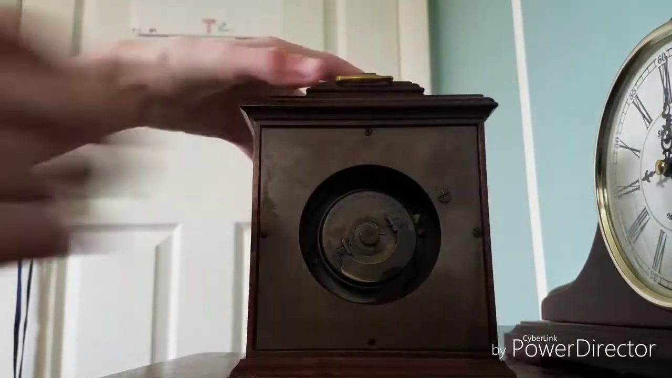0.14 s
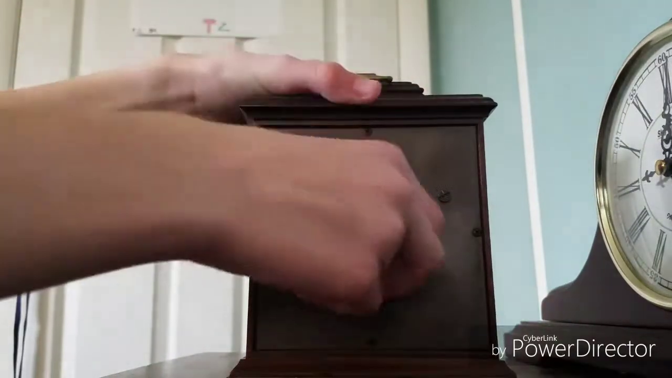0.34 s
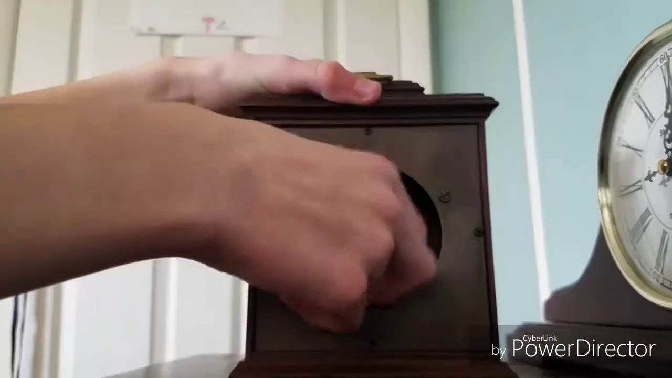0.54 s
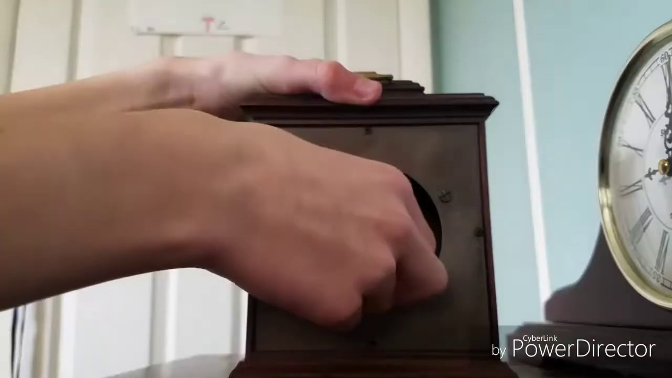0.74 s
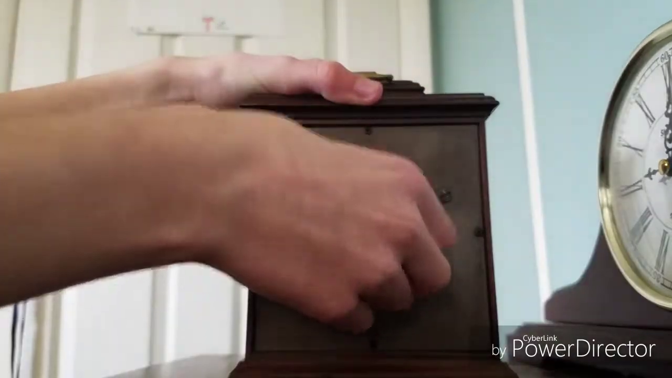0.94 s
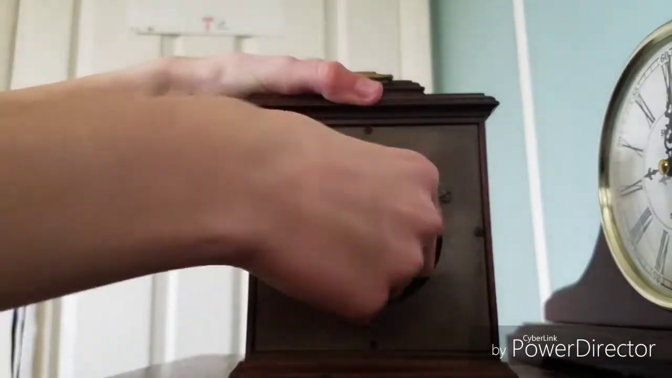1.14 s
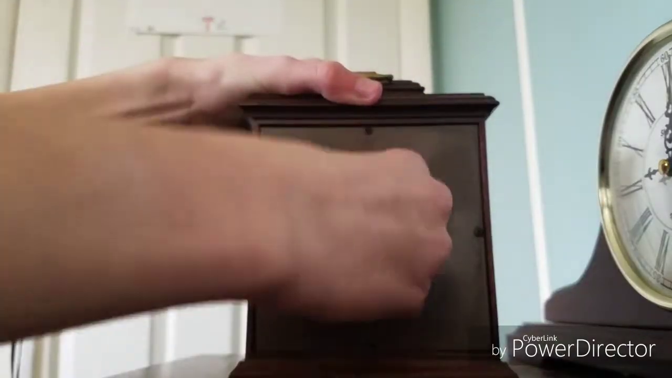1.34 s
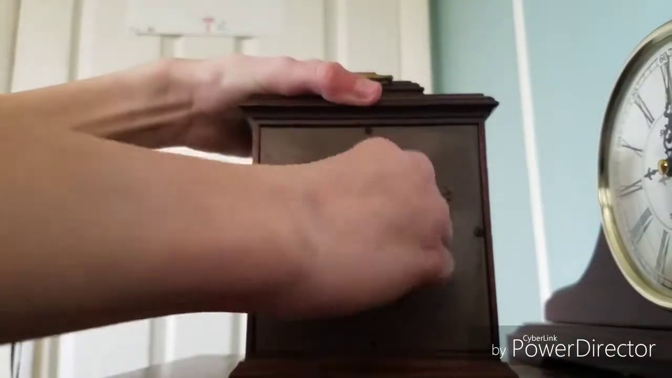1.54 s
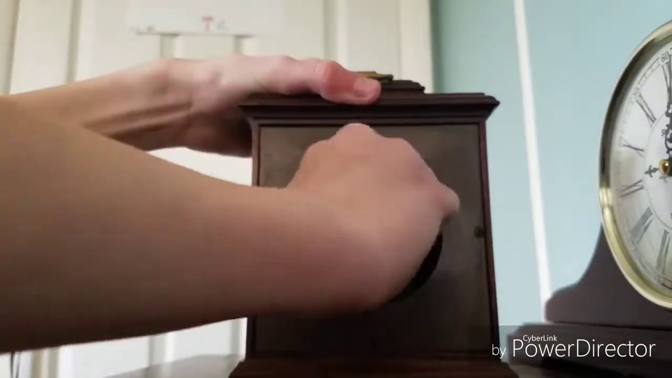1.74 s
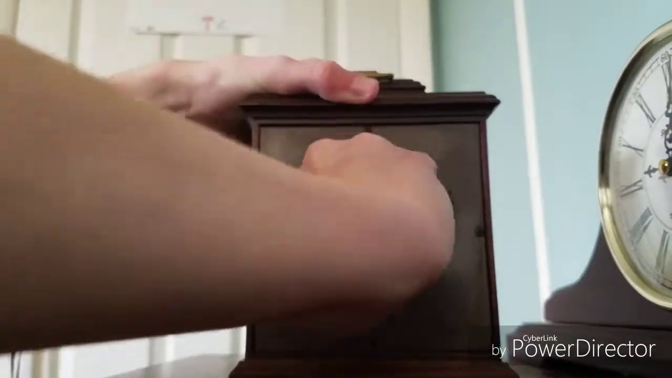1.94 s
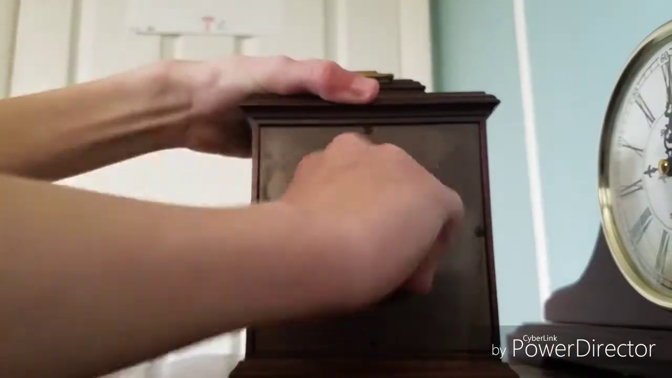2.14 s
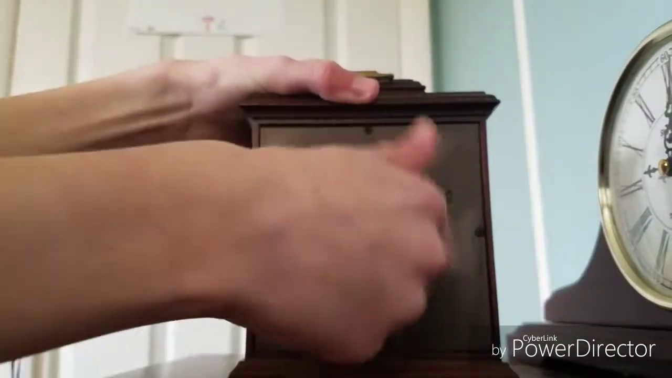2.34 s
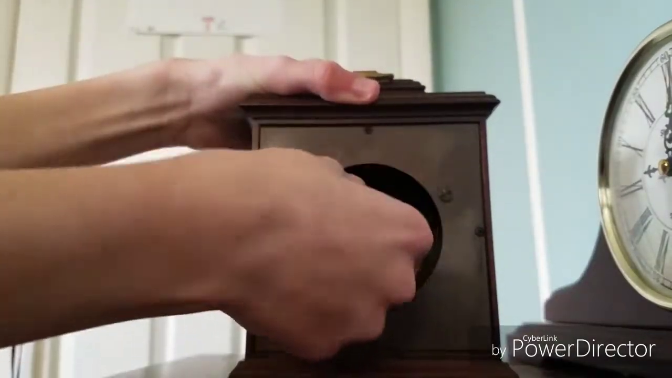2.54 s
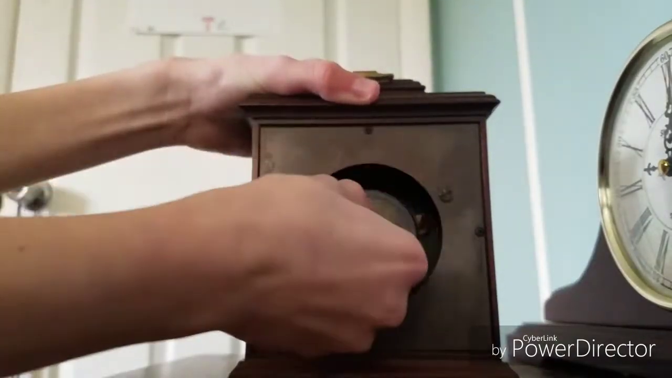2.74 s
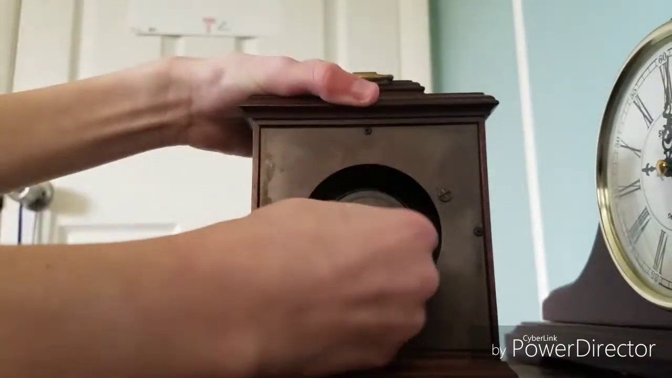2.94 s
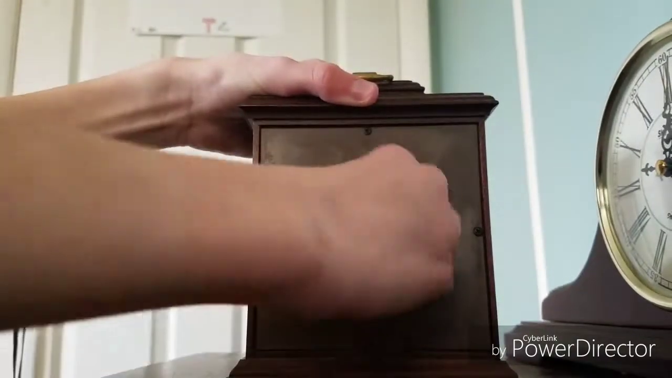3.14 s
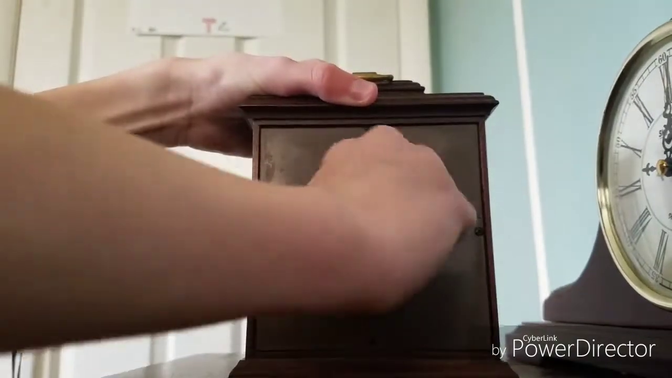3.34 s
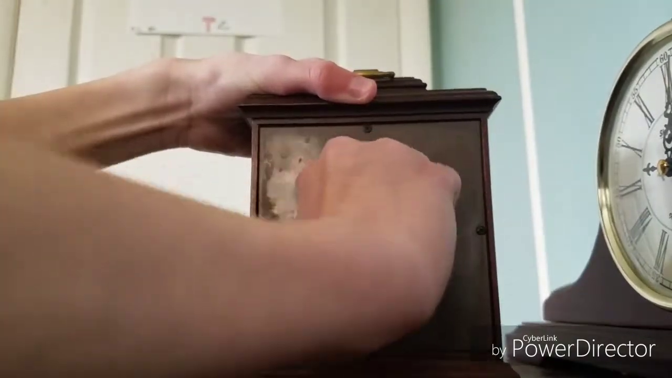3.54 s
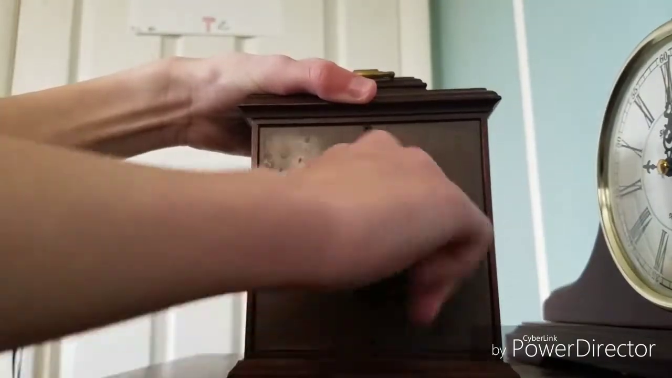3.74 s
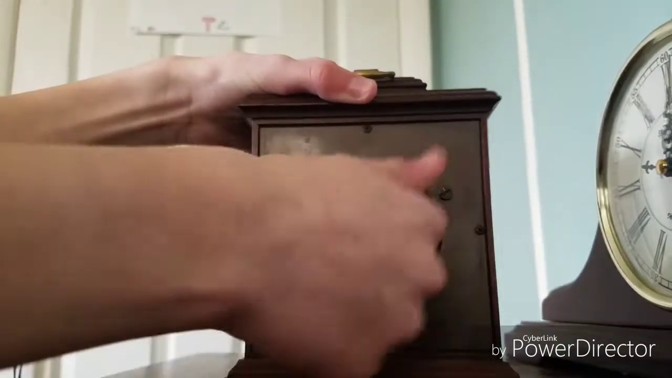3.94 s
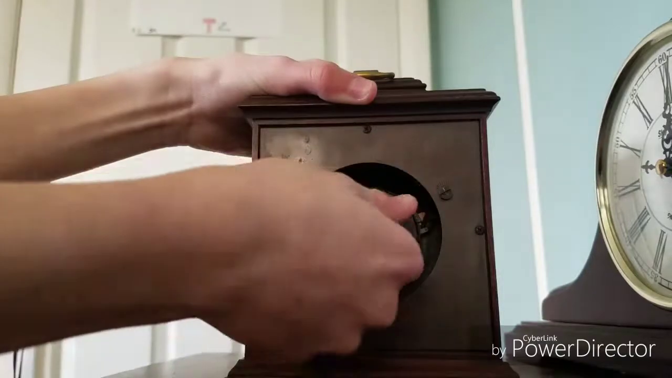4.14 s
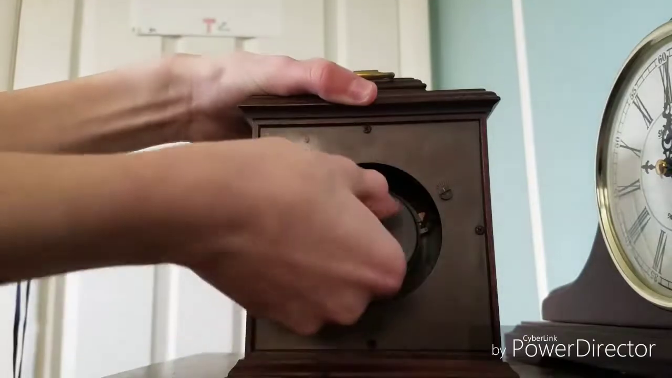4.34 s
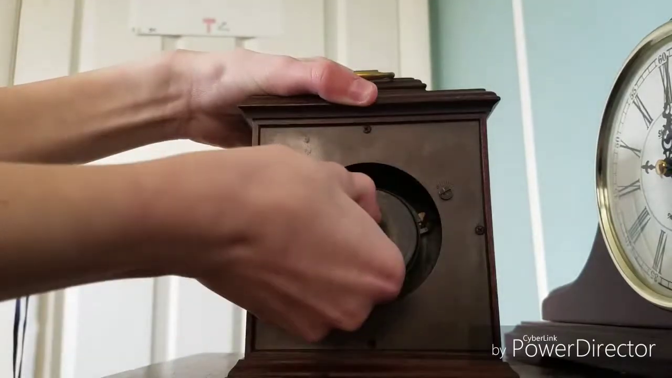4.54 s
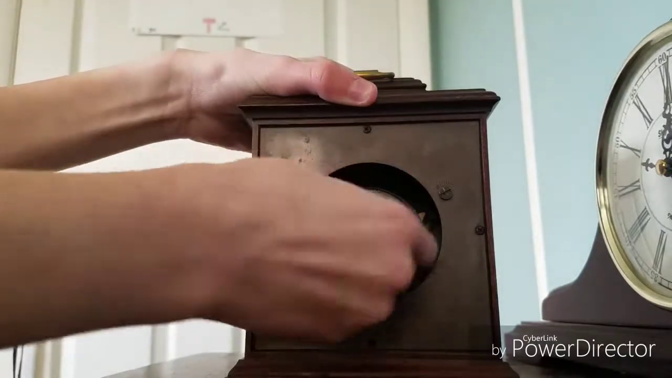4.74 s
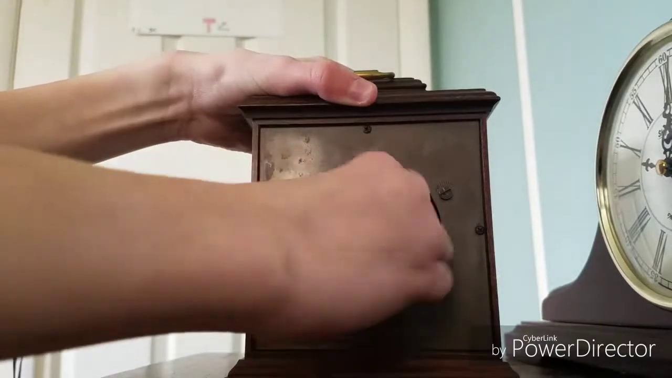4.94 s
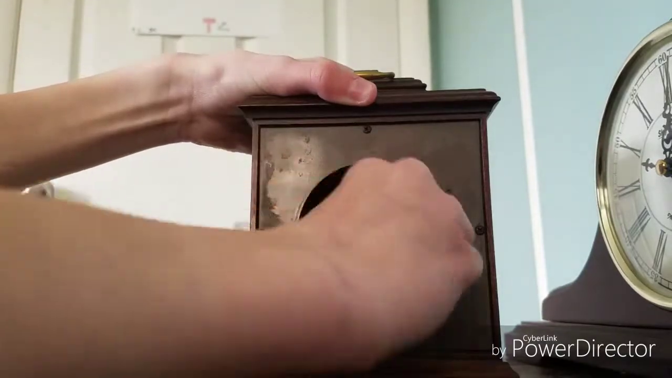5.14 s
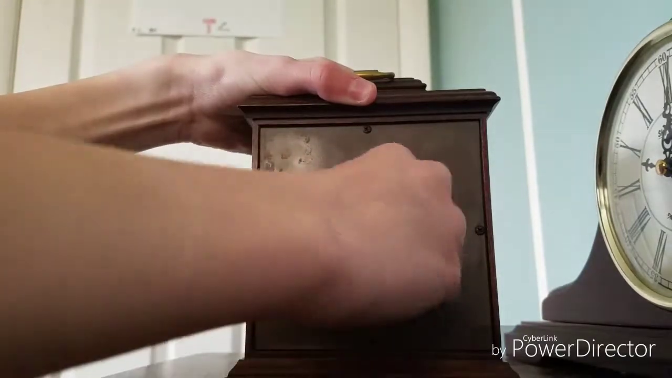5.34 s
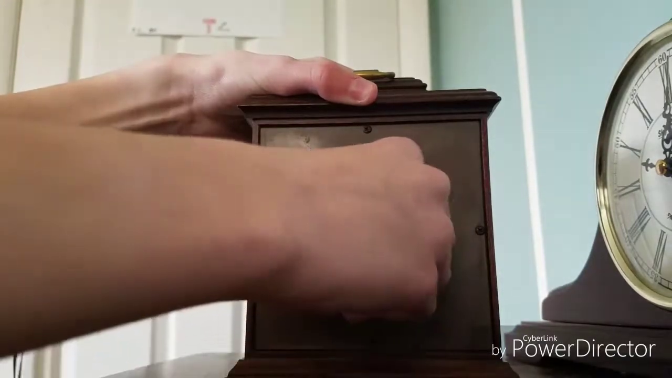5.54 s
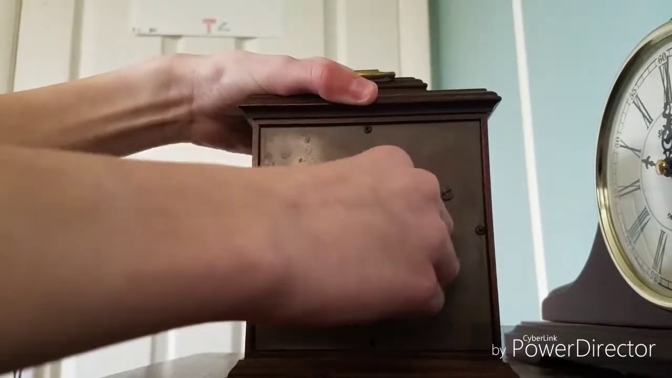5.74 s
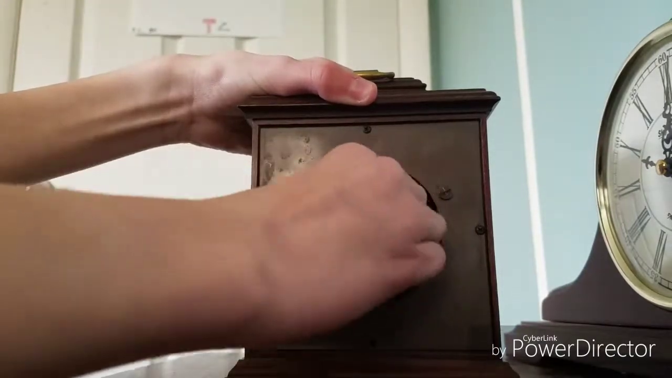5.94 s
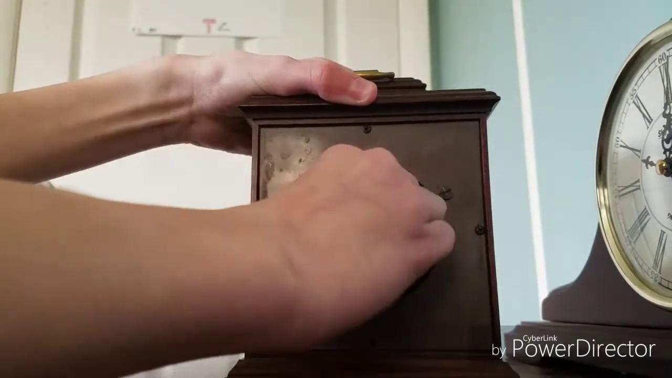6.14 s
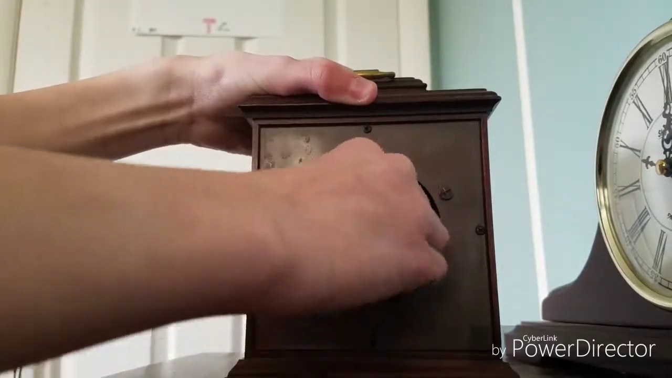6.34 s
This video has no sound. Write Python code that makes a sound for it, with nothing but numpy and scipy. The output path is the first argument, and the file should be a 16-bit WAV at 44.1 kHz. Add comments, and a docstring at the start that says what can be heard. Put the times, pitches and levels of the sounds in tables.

```python
"""Soft knocks and skin rubbing on wood come first, over faint ticking; then a hand winds a mantel clock.
Ratchet: each pawl drop rings tip, steel and wooden case as decaying modes driven by a burst of contacts.
Knocks ring case and panel modes; escapement beats ring three mode sets; grip and background are shaped noise.
Two microphone ports hear it close, in a small quiet room of early echoes and a diffuse tail."""
import sys
import numpy as np
from scipy import signal
from scipy.fft import rfft, irfft
from scipy.io import wavfile
from scipy.ndimage import uniform_filter1d

SR = 44100
rng = np.random.default_rng(int(sys.argv[2]) if len(sys.argv) > 2 else 0)


def log_audio(samples):
    """Write samples as a 16-bit WAV file to the path given in sys.argv[1]."""
    # one column per channel
    frames = np.atleast_2d(samples).T
    # limit to full scale, then quantise
    limited = np.clip(frames, -1, 1)
    pcm = np.round(limited * 32767).astype(np.int16)
    wavfile.write(sys.argv[1], SR, pcm)


N = 286209

# background noise spectrum, rolled off above 15.2 kHz: (frequency [Hz], relative density [dB])
BACKGROUND_SPECTRUM = [(15, -16.5), (50, -4), (100, 0), (220, -6.5), (420, -3), (950, -13.5), (1500, -14),
                       (3600, -20), (5500, -22.5), (8400, -32.5), (11000, -27), (15200, -23),
                       (15800, -47.5), (20000, -59.5)]
BACKGROUND_DB = -66
# diffuse tail decay: (frequency [Hz], t60 [s])
ROOM_T60 = [(100, 0.36), (400, 0.2), (1000, 0.14), (3000, 0.29), (8000, 0.27), (15000, 0.27)]
# diffuse tail against direct sound: (frequency [Hz], level [dB])
ROOM_LEVEL = [(100, -3), (400, -4), (1000, -10.5), (3000, -11), (8000, -7), (15000, -11)]
# table and near walls: (delay [s], left [dB], right [dB])
ECHOES = [(.0045, -14, -15), (.0078, -17, -16), (0.0129, -13.5, -19.5), (0.0146, -19, -18),
          (0.024, -22, -22.5), (0.035, -24, -21)]
# phase by which the left port leads: (frequency [Hz], phase [rad])
PORT_PHASE = [(300, 0.89), (600, .2), (1200, 1.5), (2500, .8), (5000, 1.37), (9000, 1.6), (13000, 0.93),
              (16000, 0)]
# left minus right port: (frequency [Hz], level [dB])
PORT_LEVEL = [(60, -1.5), (120, -2), (240, -3), (480, -2.5), (950, -0.5), (1890, -2.5), (3770, 0.5),
              (7520, -2.5), (15000, 2)]
# left-right likeness of diffuse sound: (frequency [Hz], correlation [-1..1])
PORT_LIKENESS = [(40, 0.27), (120, 1), (400, 0.74), (1000, 0.19), (3000, .3), (15000, 0.071)]

# low thudding passed on by the hands: (time [s], level [dB])
THUD_LEVEL = [(0.0, -57.5), (0.34, -58), (0.54, -52.5), (0.98, -63.5), (2.04, -58.5), (2.28, -64),
              (3.22, -60), (3.61, -65), (4.17, -75.5), (4.66, -73.5), (4.92, -57), (5.15, -53.5),
              (5.48, -70), (6.49, -69)]
# strokes of fingers and key, the long ones turns:
# (start [s], length [s], case murmur under the grip [dB], skin scuffing [dB])
STROKES = [(0., .04, -55, -60), (0.432, 0.046, -57, -68.5), (0.545, 0.17, -57, -63),
           (0.955, .3, -65.5, -80), (1.317, 0.38, -58.5, -60.5), (1.599, .55, -46.5, -49.5),
           (2.295, 0.21, -65.5, -72), (2.578, 0.071, -63, -61.5), (2.903, 0.074, -54.5, -65.5),
           (3.035, 0.57, -50, -48.5), (3.666, .14, -51, -60.5), (4.03, .06, -65, -68.5),
           (4.475, .08, -65, -72), (4.58, .12, -59, -65), (4.78, 0.41, -43, -51.5), (5.25, .15, -59, -67),
           (5.569, 0.069, -68.5, -68.5), (6.074, 0.12, -53, -67.5), (6.19, .1, -54, -54),
           (6.32, .06, -52, -59)]
# thud, murmur and scuff spectra: (frequency [Hz], relative density [dB])
THUD_SPECTRUM = [(30, -13.5), (55, -2.5), (110, -2), (220, -7), (400, -35.5)]
MURMUR_SPECTRUM = [(200, -22), (370, -5.5), (500, -3.5), (950, 4.5), (1300, -4.5), (2000, -29)]
SCUFF_SPECTRUM = [(900, -27.5), (1400, 1.5), (2400, -9), (3600, -10.5), (6000, -16), (15000, -17.5),
                  (16000, -50)]
PRESS_DB_PER_S, LET_GO_DB_PER_S = 348.5, 198  # swell and decay of a stroke
FLICKER_DB = 3  # scuff level over time, and patchiness of all three noises

# three contacts of a beat: (delay [s], burst width [s], relative pitch smear [1],
# modes (frequency [Hz], level [dB], t60 before damping [s]))
BEAT_CONTACTS = [(0., 0.0019, 0.004, [(8450, 3, 0.032), (11670, -2, 0.011)]),
                 (0.015, 0.006, 0.086, [(11800, 3.5, 0.0089), (7980, -7.5, 0.0095), (15800, 0, 0.011),
                 (987, 3.5, 0.036)]), (0.02, 0.024, .04, [(2666, -7, 0.0096), (3610, -0.5, 0.013),
                 (4250, -5.5, 0.014), (6550, -10, 0.009), (8400, -2, .015), (11730, -6, .01),
                 (14810, -5, .01)])]
SWING_S, TICK_S, TOCK_S = 0.449, 0.194, 0.4295  # full balance swing; first tick, first tock
TICK_DB, TOCK_DB = -48.5, -46  # at time zero
TICK_DROP_DB, TOCK_DROP_DB = -14, -10  # final contact within the beat
BEAT_FADE_DB_PER_S, BEAT_VARY_DB = -0.5, 1

# fingers and key on the case: (time [s], level [dB], favoured pitch [Hz],
# hard edge [dB], t60 factor [1])
KNOCKS = [(0.009, -36, 103, -56, 0.24), (0.36, -42, 81.5, -64, 1.1), (0.437, -40.5, 1500, -57, 2.5),
          (0.469, -29.5, 103, -59, 0.24), (0.521, -28, 600, -39, 0.65), (0.524, -20, 1500, -40, 2.5),
          (0.61, -26, 1500, -38, 2.5), (0.67, -27, 101, -62, 0.78), (0.878, -31, 600, -44, .8),
          (1.03, -47, 700, -65, 2.4), (1.298, -44, 260, -68, 1.1), (1.409, -26.5, 340, -65, 0.92),
          (1.428, -2, 935, -14.5, 1.2), (1.539, -25.5, 870, -55, 1.5), (2.303, -35.5, 530, -71.5, 0.57),
          (2.365, -44, 152.8, -75.5, 0.38), (2.471, -41.5, 277, -77.5, 0.66), (2.568, -45, 150, -64, 0.4),
          (2.669, -47, 680, -69, 0.73), (2.799, -41.5, 276, -72, 0.6), (2.889, -42, 120, -70, 0.85),
          (3.281, -19.5, 880, -54.5, 0.89), (3.664, -12, 400, -66.5, 1), (4.17, -52.5, 200, -80, 0.48),
          (4.59, -51, 110, -80, .5), (5.204, -31, 860, -60, 0.37), (5.371, -32.5, 613, -78, 1.06),
          (5.566, -33.5, 620, -77, 0.84), (5.739, -35, 330, -77.5, 0.7), (5.749, -33, 347, -70, 0.8),
          (5.854, -44.5, 810, -66, 0.66), (6.075, -38, 950, -70, 2), (6.094, -38, 900, -53.5, 1.4)]
# wooden case modes: (frequency [Hz], level [dB], t60 before damping [s])
CASE_MODES = [(103, -16, 0.052), (159, -13.5, 0.081), (229, -5.5, 0.069), (287, -25.5, 0.3),
              (358.3, 0, 0.073), (383, -10.5, 0.037), (455, -10, 0.084), (489, -16, 0.22),
              (586.4, -11, 0.21), (672.2, -10.5, 0.15), (725, 3.5, 0.036), (801, 1, 0.049),
              (831.5, 3.5, 0.03), (882, 8, 0.033), (973, 6, 0.029), (1068.6, 0.5, 0.073), (1165, 4, 0.022),
              (1410, -9.5, 0.023), (1470, -17.5, 0.16), (1685, -5, 0.02)]
# hard-knock panel modes: (frequency [Hz], level [dB], t60 before damping [s])
PANEL_MODES = [(1780, -5.5, 0.013), (2080, 0.5, 0.012), (2333, 5.5, 0.029), (2960, -17, 0.08),
               (4100, -9.5, 0.013), (5960, -20.5, 0.029), (8540, -22.5, 0.029), (12000, -22, 0.013)]

# pawl drops: (time [s], case ring [dB], steel body [dB], bright ping [dB], favoured case pitch [Hz])
CLICKS = [(1.609, -14, -25, -22, 860), (1.664, -23, -27.5, -26.5, 890), (1.706, -18.5, -29.5, -26.5, 880),
          (1.749, -22, -24.5, -25.5, 824), (1.793, -22, -24, -25, 830), (1.853, -18.5, -27, -19, 900),
          (1.933, -18.5, -26.5, -26, 805), (1.982, -26, -26, -27.5, 894), (2.027, -26, -31, -24, 1170),
          (2.076, -19.5, -27, -26.5, 902), (2.135, -20, -33, -43, 792), (2.987, -24, -27, -21, 829),
          (3.035, -20.5, -24.5, -29, 830), (3.08, -19, -25, -30, 900), (3.121, -20.5, -23.5, -22, 890),
          (3.171, -20.5, -24.5, -31.5, 820), (3.24, -20.5, -23.5, -29.5, 840),
          (3.313, -23.5, -23.5, -23.5, 799), (3.371, -22.5, -25.5, -21.5, 662),
          (3.419, -23, -26, -24.5, 790), (3.474, -22, -24, -25.5, 668), (3.519, -22, -27, -26, 710),
          (3.574, -19.5, -25, -26.5, 726), (3.722, -15.5, -31, -36, 705), (4.625, -43, -50, -65, 900),
          (4.723, -16, -24, -26.5, 705), (4.789, -18, -24, -24.5, 977), (4.832, -19.5, -29, -26.5, 900),
          (4.86, -18, -27, -26, 902), (4.891, -19, -26, -26, 890), (4.926, -17.5, -26.5, -22, 910),
          (4.957, -20.5, -28, -20.5, 880), (4.993, -15, -24.5, -27.5, 800), (5.036, -20.5, -24, -28.5, 890),
          (5.082, -20.5, -29.5, -22.5, 780), (5.135, -21, -27, -21.5, 870), (5.242, -13, -29, -39, 800),
          (6.179, -18.5, -25, -35, 920), (6.307, -11, -27.5, -47, 850)]
# pawl, wheel and plate modes: (frequency [Hz], level [dB], t60 before damping [s])
STEEL_MODES = [(2065, -10, 0.081), (2416, 1, 0.036), (2640, -11.5, 0.081), (2964, -9.5, 0.063),
               (3313, 3, 0.023), (3646, 5.5, 0.02), (4227, -0.5, 0.036), (5206, 0.5, 0.023),
               (6060, -2.5, 0.038), (7010, -4, 0.033), (8020, 1.5, 0.022), (8600, -1, 0.032),
               (9910, 6, 0.018), (11400, -2.5, 0.027), (12100, -3.5, 0.02)]
# pawl tip modes: (frequency [Hz], level [dB], t60 before damping [s])
PING_MODES = [(13840, 1, 0.0047), (14340, -1, 0.023), (15300, -16.5, 0.012), (14290, -10, 0.015),
              (16740, -65.5, .01)]
# steel let through by the hand on each turn: (from [s], favoured pitch [Hz], lift [dB])
GRIPS = [(1.5, 9000, 2), (2.9, 3550, 7), (4.6, 9000, 6), (6.1, 4600, 6)]
GRIP_OCTAVES = 0.25
CLATTER_S = 0.002  # pawl chatter on the tooth, Gaussian width
VARY_DB, STEEL_VARY_DB = 3, 4  # mode-to-mode spread of each blow
EDGE_HZ = 16600


def amp(db):
    """Decibels to gain."""
    return 10 ** (np.asarray(db) / 20)


def read(points, hz):
    """Interpolates a table on a log-frequency axis."""
    point_hz, value = np.transpose(points)
    return np.interp(np.log(hz + 1), np.log(point_hz + 1), value)


def add(mix, time_s, sound):
    """Mixes a two-port sound in at a time, cutting it at the end."""
    part = mix[:, round(time_s * SR):][:, :sound.shape[1]]
    part += sound[:, :part.shape[1]]


def octaves_from(modes, hz):
    """Distance of each mode from a pitch, as a column in octaves."""
    return np.log2(np.array(modes)[:, :1] / hz)


def alike(first, second, hz):
    """Blends two independent spectra into a port pair with the tabled likeness."""
    same = np.clip(read(PORT_LIKENESS, hz), -1, 1)[:, None]
    return np.array([first, same * first + np.sqrt(1 - same ** 2) * second])


def clatter(width_s, rise_s):
    """Burst of tiny contacts, whitened repeatedly so that it excites all pitches nearly evenly."""
    t = np.arange(2048) / SR
    envelope = np.exp(-(t / max(width_s, 1e-4)) ** 2) * (1 - np.exp(-t / max(rise_s, 2e-5)))
    burst = rng.standard_normal(2048) * envelope
    for _ in range(4):
        spectrum = rfft(burst)
        burst = irfft(spectrum / (abs(spectrum) + 1e-9))
        burst *= envelope / (envelope + 0.09)
    return burst


def strike(modes, width_s, rise_s, smear, vary_db, colour_db=0., damp=0.68, span_s=0.003,
           count=3, together=False):
    """A contact burst rings a random cluster at each mode; rms 1 in the loudest span."""
    hz, db, t60_s = np.repeat(np.transpose(modes), count, 1)[:, :, None]
    t = np.arange(5000) / SR
    level_chance, pitch_chance, port_chance = rng.standard_normal((3, len(hz), 1))
    colour_db = np.repeat(colour_db + np.zeros((len(modes), 1)), count, 0)
    db = db + colour_db + vary_db * level_chance
    # a knock starts all case modes one way; other strikes alternate
    sign = 1 if together else (-1) ** np.arange(len(hz))[:, None]
    size = sign * amp(db - 60 * t / (t60_s * max(damp, 0.1)))
    phase = 2 * np.pi * hz * (1 + smear * pitch_chance) * t
    apart = 0.13 * np.log2(hz / 600).clip(0) * port_chance  # high modes reach the ports unalike
    left = (size * np.sin(phase + apart)).sum(0)
    right = (size * np.sin(phase - apart)).sum(0)
    sound = signal.fftconvolve([left, right], clatter(width_s, rise_s)[None], axes=1)
    power = uniform_filter1d((sound ** 2).mean(0), int(span_s * SR), mode="constant")
    return sound / np.sqrt(power.max())


def noise(spectrum, level_db, patchy_db, size):
    """Two-port noise from random short-time spectra with drifting patches."""
    frames, hz = 4 * N // size + 6, np.fft.rfftfreq(size, 1 / SR)
    a, b, c, d, patch = rng.standard_normal((frames, len(hz), 5)).T
    patch = uniform_filter1d(patch, size=8, axis=0)
    patch = uniform_filter1d(patch, size=6, axis=1)
    shape_db = read(spectrum, hz)[:, None] + patchy_db * patch / patch.std()
    pair = alike(a + 1j * b, c + 1j * d, hz) * amp(shape_db)
    x = signal.istft(pair, nperseg=size, noverlap=3 * size // 4)[1][:, :N]
    return x / x.std() * amp(level_db)


def background():
    """Steady background noise."""
    return noise(BACKGROUND_SPECTRUM, BACKGROUND_DB, 1.3, size=1024)


def room(x):
    """Diffuse tail: sparse taps of random sign, each band dying at its own speed."""
    taps = np.zeros((2, 22000))
    at = np.arange(160, 21980, 20) + rng.integers(0, 20, (2, 1091))
    np.put_along_axis(taps, at, rng.choice([-1., 1.], at.shape), 1)
    hz, t, z = signal.stft(taps, SR, nperseg=256)
    fall = amp(-60 * t / read(ROOM_T60, hz)[:, None])
    band_gain = amp(read(ROOM_LEVEL, hz)) / np.linalg.norm(fall, axis=1)
    z = alike(z[0], z[1], hz) * fall * band_gain[:, None]
    tail = signal.istft(z, SR, nperseg=256)[1]
    tail = tail * (np.arange(z.shape[2] * 128 - 128) > 160) / np.sqrt(128 / 20)
    return signal.fftconvolve(x[None], tail, axes=1)[:, :N]


def rotating_tails(x):
    """Three diffuse tails fade into one another at a steady 3.1 Hz, so no tail tone stands still."""
    turn = 2 * np.pi * 3.1 * np.arange(N) / SR
    return sum(room(x * np.sqrt(2 / 3) * np.cos(turn + k * np.pi / 3)) for k in range(3))


def echoes(x):
    """A few single reflections, duller than the direct sound."""
    out = np.zeros((2, N))
    dull = signal.sosfilt(signal.butter(1, 5000, fs=SR, output="sos"), x)
    for delay_s, *port_db in ECHOES:
        add(out, delay_s, dull * amp(port_db)[:, None])
    return out


def ports(x):
    """The two ports hear the near sound with different phase and level, half the offset each."""
    hz = np.fft.rfftfreq(N, 1 / SR)
    half = amp(read(PORT_LEVEL, hz) / 2) * np.exp(0.5j * read(PORT_PHASE, hz))
    return irfft(rfft(x) * np.array([half, 1 / half]), N)


def hands():
    """Low thuds, plus wood murmur and uneven skin scuffing that swell with each stroke."""
    t = np.arange(N) / SR
    start_s, length_s, murmur_db, scuff_db = np.transpose(STROKES)[:, :, None]
    press_db = -PRESS_DB_PER_S * (start_s - t).clip(0)
    let_go_db = -LET_GO_DB_PER_S * (t - start_s - length_s).clip(0)
    murmur_db = (murmur_db + press_db + let_go_db).max(0)
    scuff_db = (scuff_db + press_db + let_go_db).max(0)
    flicker = uniform_filter1d(uniform_filter1d(rng.standard_normal(N), size=300), size=300)
    scuff_db = scuff_db + FLICKER_DB * flicker / flicker.std()
    thud = noise(THUD_SPECTRUM, np.interp(t, *np.transpose(THUD_LEVEL)), FLICKER_DB, size=2048)
    murmur = noise(MURMUR_SPECTRUM, murmur_db, FLICKER_DB, size=512)
    scuff = noise(SCUFF_SPECTRUM, scuff_db, FLICKER_DB, size=256)
    return thud + murmur + scuff


def escapement():
    """Unlocking, impulse and drop follow within hundredths of a second, twice in each swing."""
    out = np.zeros((2, N))
    chance = rng.standard_normal((15, 2))
    beats = ((TICK_S, TICK_DB, TICK_DROP_DB), (TOCK_S, TOCK_DB, TOCK_DROP_DB))
    for swing in range(15):
        for (first_s, db, drop_db), vary in zip(beats, chance[swing]):
            time_s = first_s + swing * SWING_S
            beat_db = db + BEAT_FADE_DB_PER_S * time_s + BEAT_VARY_DB * vary
            for contact, part_db in zip(BEAT_CONTACTS, (-2.5, -11., drop_db)):
                delay_s, width_s, smear, modes = contact
                ring = strike(modes, width_s, 0.0033, smear, VARY_DB, span_s=0.0046, count=6)
                add(out, time_s + delay_s, amp(beat_db + part_db) * ring)
    return out


def knocks():
    """Blows favour case modes near their pitch, hard ones add an edge; a loose key chatters longer."""
    out = np.zeros((2, N))
    for time_s, db, hz, edge_db, ring in KNOCKS:
        octaves = octaves_from(CASE_MODES, hz)
        colour_db = -10. * octaves.clip(0) + 6.6 * octaves.clip(None, 0)
        blow = strike(CASE_MODES, 0.0006 * max(ring, 1) ** 2, 0.00049, 0.02, VARY_DB, colour_db,
                      damp=ring, count=2, together=True)
        # the blow keeps only a band around its favoured pitch
        band = signal.butter(2, [hz / 2.2, hz * 2.95], "band", fs=SR, output="sos")
        blow = signal.sosfilt(band, blow)
        edge = strike(PANEL_MODES, 0.00045, 0.00022, 0.035, VARY_DB, span_s=0.0018, count=7)
        add(out, time_s + 0.0011, amp(db) * blow / abs(blow).max())
        add(out, time_s + 0.00088, amp(edge_db) * edge)
    return out


def ratchet():
    """Each drop of the pawl pings its tip, clatters the steel, then the case takes it up."""
    out = np.zeros((2, N))
    for time_s, case_db, steel_db, ping_db, hz in CLICKS:
        _, grip_hz, lift_db = [grip for grip in GRIPS if grip[0] < time_s][-1]
        grip_db = lift_db * np.exp(-(octaves_from(STEEL_MODES, grip_hz) / GRIP_OCTAVES) ** 2)
        case_colour_db = -6. * abs(octaves_from(CASE_MODES, hz))
        ping = strike(PING_MODES, 0.0039, 0.00022, 0.0077, VARY_DB, span_s=0.0069)
        steel = strike(STEEL_MODES, 0.002, 0.00033, 0.05, STEEL_VARY_DB, grip_db,
                       damp=0.45, span_s=0.0035, count=6)
        case = strike(CASE_MODES, CLATTER_S, 0.00033, 0.0092, VARY_DB, case_colour_db,
                      span_s=0.00051, count=1)
        add(out, time_s, amp(ping_db) * ping)
        add(out, time_s, amp(steel_db) * steel)
        add(out, time_s + 0.00046, amp(case_db) * case)
    return out


def scene():
    """The clock near the microphone, the room behind it."""
    # high-pass keeps ratchet and ticks thin; knocks keep their bass
    bass_cut = signal.butter(4, 330, "high", fs=SR, output="sos")
    clock = signal.sosfilt(bass_cut, ratchet() + escapement()) + knocks()
    near = ports(clock + echoes(clock))
    return near + rotating_tails(clock.mean(0)) + hands() + background()


def record(dry):
    """Band limit of the recorder: linear-phase low-pass."""
    lowpass = signal.firwin(511, EDGE_HZ, window=("kaiser", 9), fs=SR)
    return signal.oaconvolve(dry, lowpass[None], "same")


dry = scene()
out = record(dry)
log_audio(out)
```